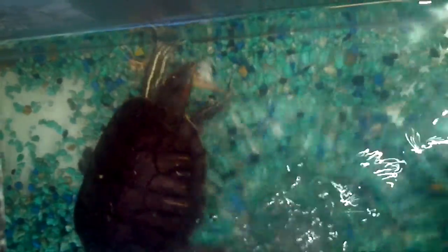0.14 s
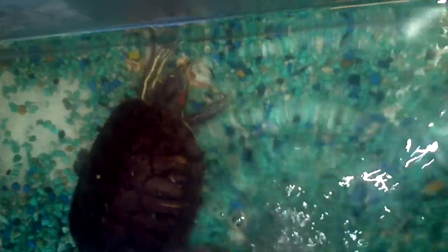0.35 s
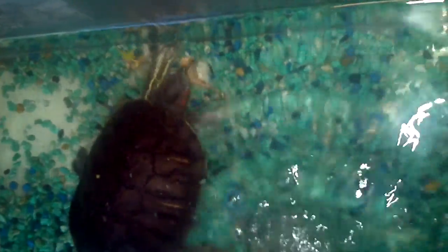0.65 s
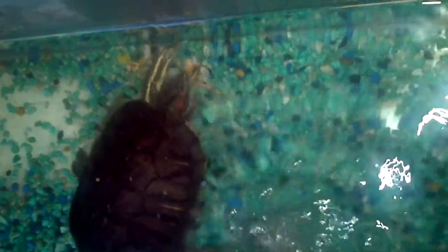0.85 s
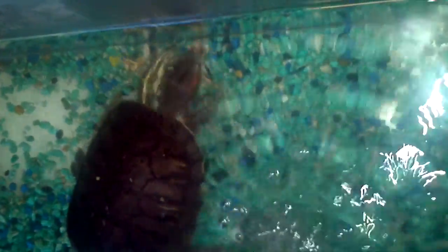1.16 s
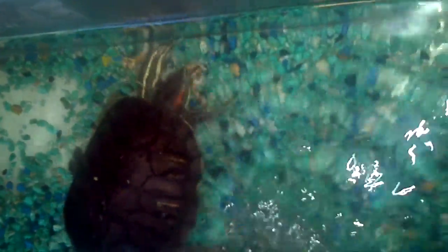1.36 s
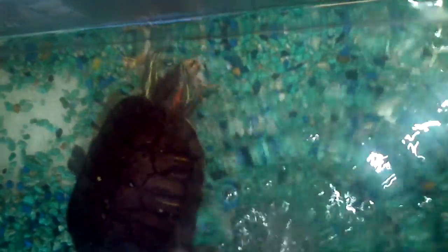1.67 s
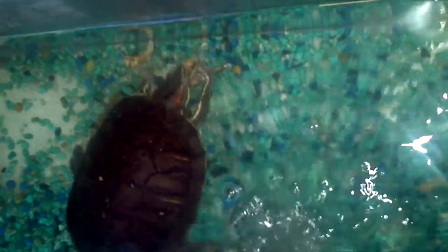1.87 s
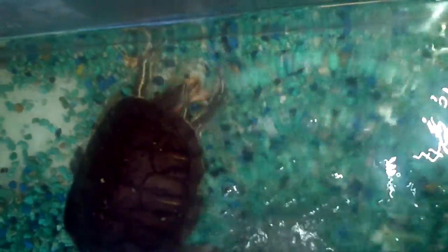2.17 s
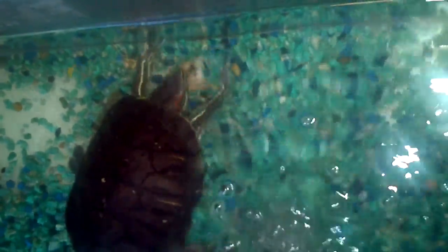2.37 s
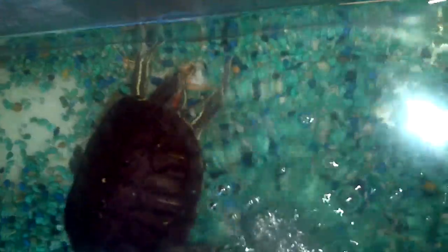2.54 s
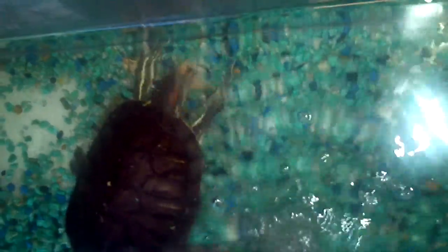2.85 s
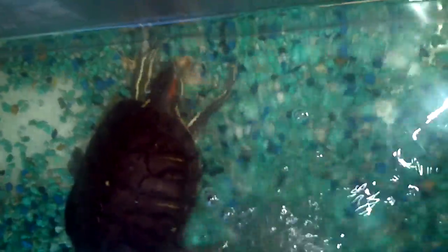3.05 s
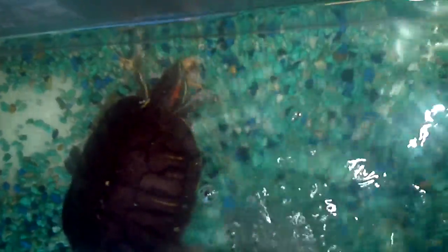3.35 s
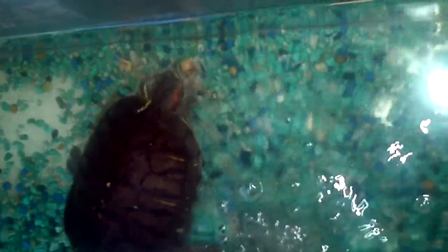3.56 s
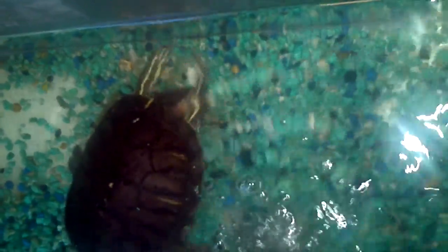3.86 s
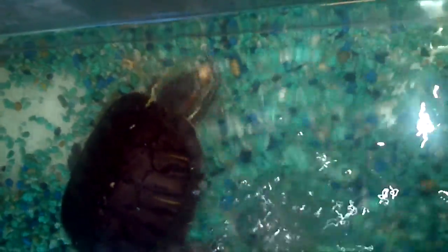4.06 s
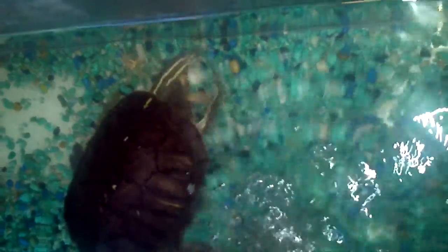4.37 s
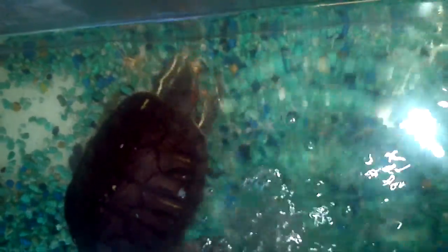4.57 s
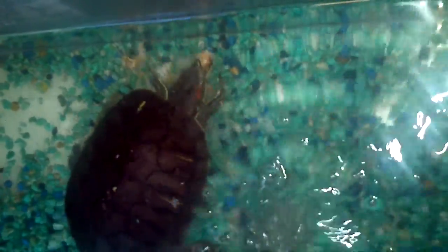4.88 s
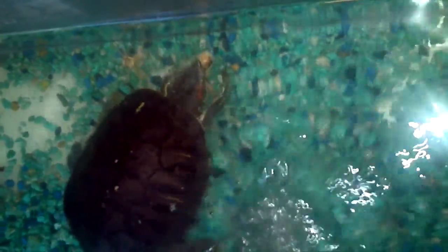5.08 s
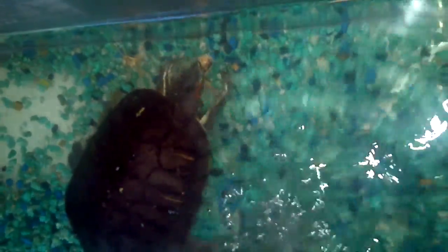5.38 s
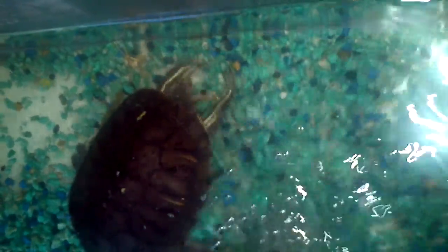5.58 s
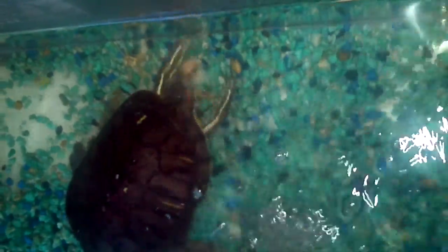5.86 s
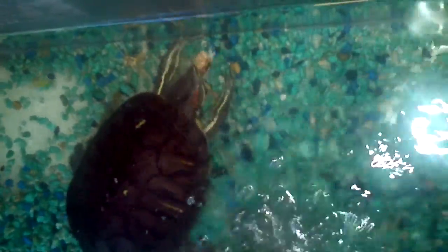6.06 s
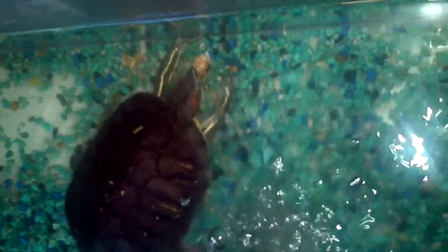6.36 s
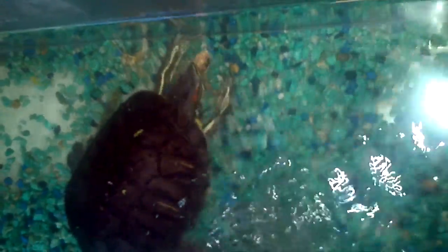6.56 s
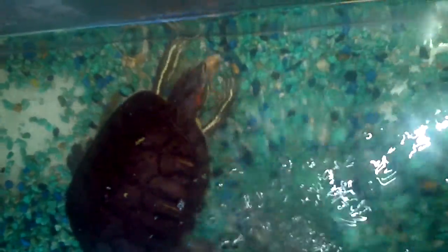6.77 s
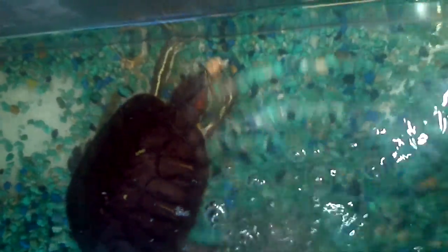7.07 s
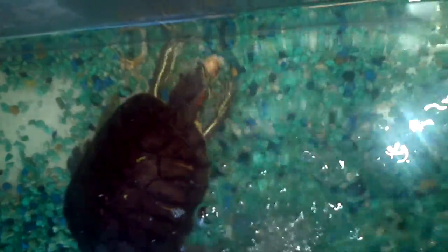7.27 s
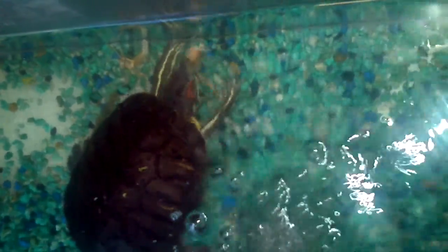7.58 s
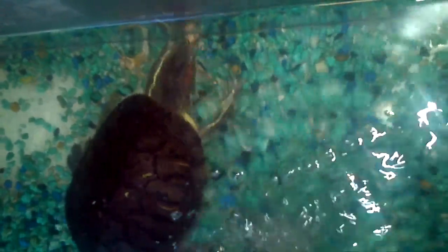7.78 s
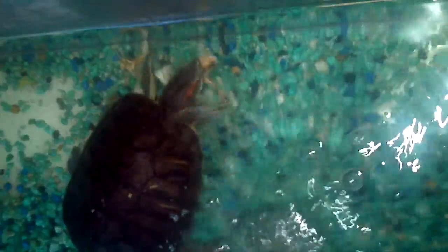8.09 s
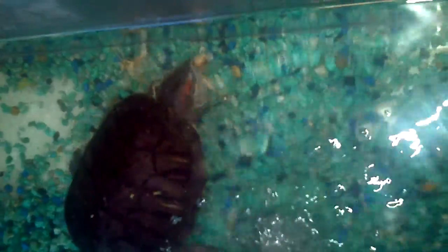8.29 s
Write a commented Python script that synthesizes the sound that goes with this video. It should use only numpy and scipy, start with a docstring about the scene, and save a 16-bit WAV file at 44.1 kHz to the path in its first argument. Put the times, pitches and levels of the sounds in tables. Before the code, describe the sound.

From 0 seconds a glass tank bubbles steadily: thousands of tiny bubbles burst at the surface in a dense, bright fizz, with crisp irregular snaps many times a second. Larger bubbles add rounded, hollow plops and short gurgling bloops, mostly mid-pitched with a slight upward glide, ringing briefly in the tank. A low pump hum with a slightly uneven buzz and a soft rush of water lie beneath throughout. The churn thickens near 2.8 seconds, and especially hard pops stand out at about 3.0, 3.1 and 3.3. A round plop comes near 3.8. The fizz thins between roughly 4.7 and 5.1, surges around 5.5 and again near 6.7, then eases. A strong snap and plop coincide near 7.7, and the fizz is building again as it ends around 8.4. Close, wide stereo, with short, glassy wall echoes.

```python
"""Bubbles bursting in a glass tank

Air bubbles rise and burst at the surface of a shallow glass tank while an air pump hums.
Large bubbles are dying sines that climb in pitch, and their plops strike the air modes of the tank.
Small bubbles snap and fizz between the glass walls: random grains sent through dense, decaying echoes.
Shaped noise makes the rush of water, mains harmonics and one narrow resonance make the pump.
Two microphones a hand apart are crossed through a short delay for stereo width."""
import sys
import numpy as np
from scipy import signal
from scipy.io import wavfile
from scipy.ndimage import uniform_filter1d

SR = 44100
rng = np.random.default_rng(int(sys.argv[2]) if len(sys.argv) > 2 else 0)


def log_audio(samples):
    """Write samples as a 16-bit WAV file to the path given in sys.argv[1]."""
    # one column per channel
    frames = np.atleast_2d(samples).T
    # limit to full scale, then quantise
    limited = np.clip(frames, -1, 1)
    pcm = np.round(limited * 32767).astype(np.int16)
    wavfile.write(sys.argv[1], SR, pcm)


def rack_gain(trim_db):
    """Turn a fader trim in dB into the linear factor to multiply a signal by."""
    fader = np.asarray(trim_db, float)
    return 10 ** (fader / 20)


N = 371763

# The clearest bursts of the bubble film. Each row: start in seconds, peak level in dB ahead of record(),
# starting pitch in Hz, click level in dB before weaker snaps are made crisper.
FILM_BURSTS = [(0.0219, -21.5, 7200, -33), (0.0423, -15.5, 4680, -16.5), (0.167, -50, 4100, -26),
               (0.18, -19, 7300, -28), (0.195, -22, 7060, -31), (0.231, -20.5, 7100, -34),
               (0.281, -23.5, 6900, -30), (0.305, -22, 7310, -18), (0.331, -31, 7540, -20),
               (0.3508, -14.5, 7520, -20), (0.4127, -26, 7520, -20), (0.4292, -18.5, 7240, -31),
               (0.451, -37, 7790, -24), (0.528, -22.5, 7400, -13), (0.5925, -24.5, 8250, -18),
               (0.627, -10, 7000, -16), (0.702, -32, 7500, -12), (0.715, -17, 8200, -9),
               (0.7911, -16, 8230, -36), (0.8415, -16.5, 6300, -21), (0.88, -11, 7000, -18),
               (0.9005, -32, 10000, -20), (0.9314, -30, 7400, -18), (0.934, -23, 7340, -16),
               (0.983, -12.5, 7520, -16), (1.007, -40, 6940, -5), (1.109, -23, 7310, -30),
               (1.1283, -19, 7500, -15), (1.1662, -32.5, 6240, -15), (1.208, -25, 4990, -32),
               (1.2486, -28, 7260, -34), (1.294, -18, 9100, -17), (1.337, -22, 7520, -32),
               (1.3838, -29, 8000, -19), (1.407, -16, 7650, -29), (1.4477, -28, 7030, -25),
               (1.566, -39, 3500, -40), (1.6263, -23, 7000, -31), (1.655, -23, 7700, -32),
               (1.684, -21.5, 7040, -32), (1.705, -23.5, 6450, -16), (1.7524, -24, 4540, -37),
               (1.7716, -23, 7600, -26), (1.7927, -27, 6700, -27), (1.842, -25, 7800, -31),
               (1.9607, -21.5, 6700, -24), (2.0583, -31, 3760, -33), (2.0844, -44, 7100, -26),
               (2.1013, -20.5, 7520, -19), (2.161, -15, 5200, -14), (2.214, -15.5, 7460, -31),
               (2.2383, -18, 6800, -20), (2.341, -44, 7780, -19), (2.395, -37, 7020, -26),
               (2.4114, -20, 6900, -30), (2.503, -24.5, 7520, -28.5), (2.626, -29, 7520, -26),
               (2.646, -35, 4080, -26), (2.661, -15, 7500, -10), (2.7055, -25, 8100, -13),
               (2.7273, -13, 7000, -17), (2.8062, -12, 7800, -26), (2.8418, -19.5, 7400, -26),
               (2.924, -29, 9600, -18), (2.9872, -7.5, 7240, -8), (3.092, -21, 7800, -26),
               (3.1354, -2, 7330, -17.5), (3.299, -25, 10100, 5), (3.32, -20, 7000, -33),
               (3.4176, -22.5, 7790, -16), (3.464, -24.5, 3900, -25), (3.5312, -17.5, 7630, -36),
               (3.5853, -30, 7140, -25), (3.665, -15, 6300, -34), (3.692, -18, 4540, -43),
               (3.723, -17, 7240, -17), (3.822, -28, 6900, -31), (3.8435, -21.5, 7250, -33),
               (3.862, -25, 5100, -37), (3.881, -41, 7300, -32), (3.9085, -18.5, 6520, -15.5),
               (3.963, -19, 6900, -16), (4.0263, -31, 10400, -33), (4.23, -42, 7500, -33),
               (4.2622, -23, 7700, -27), (4.327, -30, 7400, -31), (4.343, -22, 7200, -29),
               (4.439, -36.5, 9900, -33.5), (4.496, -19.5, 7060, -21), (4.552, -30, 6990, -23),
               (4.597, -29.5, 7700, -33), (4.6744, -43, 7590, -26), (4.713, -31, 8250, -26),
               (4.7406, -30, 7000, -22), (4.755, -30, 4040, -26), (4.7743, -17.5, 9500, -21),
               (4.8094, -12, 6440, -28), (4.8336, -20, 7300, -26), (4.8642, -23, 8770, -21),
               (4.9262, -29.5, 10200, -26), (4.9714, -27, 4070, -26), (4.9898, -13, 6300, -17),
               (5.034, -11, 9000, -9), (5.098, -25, 4200, -15), (5.117, -28, 10400, -26),
               (5.138, -18.5, 6760, -21), (5.319, -35, 6890, -28), (5.369, -28.5, 7720, -24.5),
               (5.401, -16, 7790, -9), (5.4972, -21.5, 6900, -17), (5.576, -43, 7520, -24),
               (5.667, -24, 6900, -31), (5.686, -21.5, 7000, -30), (5.721, -12.5, 7000, -38),
               (5.826, -31, 9400, -24.5), (5.8456, -29, 4100, -26), (5.9403, -22, 4350, -32),
               (6.0084, -26.5, 4240, -18), (6.1134, -20, 7900, -38), (6.155, -24, 7030, -33),
               (6.233, -20, 8050, -22), (6.293, -25, 6970, -31), (6.2969, -21.5, 4090, -14),
               (6.372, -30, 7360, -18), (6.4084, -11.5, 7900, -32), (6.4783, -14, 7310, -11),
               (6.5255, -12, 7000, -38), (6.59, -23, 7600, -11), (6.6792, -23, 6800, -26),
               (6.7517, -28, 7000, -28.5), (6.8179, -24, 4050, -26), (6.8843, -22.5, 8900, -19),
               (6.936, -25.5, 7300, -21), (7.053, -22.5, 6700, -37), (7.1043, -16.5, 7500, -30),
               (7.1483, -20, 5340, -34), (7.225, -50, 7520, -26), (7.269, -34, 7470, -32),
               (7.398, -21, 4990, -37), (7.447, -26.5, 7350, -33), (7.49, -35, 6940, -31),
               (7.522, -24, 7360, -17), (7.558, -24.5, 7000, -35), (7.613, -25.5, 7500, -9),
               (7.6703, -9, 7300, -26), (7.735, -31, 4270, -18), (7.744, -28, 9900, -14),
               (7.781, -31, 10600, -26), (7.8222, -26, 7200, -26), (7.8452, -27, 6750, -30),
               (7.896, -24.5, 7340, -16), (7.9632, -21, 7000, -23), (8.027, -27, 7360, -34),
               (8.049, -19, 6400, -34), (8.1126, -27, 8100, -7), (8.206, -22, 6470, -26),
               (8.3058, -28, 7200, -19), (8.348, -26.5, 4100, -32.5), (8.3874, -53, 7740, -11),
               (8.412, -24, 7000, -15)]
# The clearest low bubbles closing under the surface. Each row: start in seconds, peak level in dB
# ahead of record(), starting pitch in Hz, plop share from 0 to 1.
LOW_BUBBLES = [(0.038, -25, 738, 0.6), (0.095, -39, 1420, 0), (0.118, -34.5, 1390, 0.05),
               (0.17, -44.5, 1750, .1), (0.282, -31, 664, 0.67), (0.281, -34, 1060, 0.56),
               (0.335, -27.5, 1075, 0.6), (0.336, -30, 664, 0.9), (0.336, -45, 1730, 0.2),
               (0.357, -29.5, 810, 0.26), (0.34, -30, 452, 0.2), (0.41, -30.5, 1080, 0.9),
               (0.438, -42, 1660, .1), (0.443, -31, 670, 0.53), (0.461, -32.5, 426, 0),
               (0.528, -41, 392, 0.3), (0.558, -41.5, 1750, 0), (0.603, -28.5, 700, 0.5),
               (0.631, -27.5, 1055, 0.47), (0.716, -34.5, 1820, 0.1), (0.717, -34, 406, 0.3),
               (0.84, -25.5, 1096, 0.66), (0.882, -32.5, 1110, 0.05), (0.98, -36, 1130, 0.5),
               (1.034, -32, 1730, 0.9), (1.156, -41, 1130, 0.4), (1.186, -26.5, 1170, 1),
               (1.296, -34.5, 1130, 0.26), (1.298, -38, 1720, 0.2), (1.356, -33.5, 944, 0.28),
               (1.445, -31, 664, 0.5), (1.448, -32, 430, 0.3), (1.585, -40, 1030, 0),
               (1.617, -37, 1730, 0.4), (1.635, -32.5, 1710, 0.15), (1.652, -39, 1005, 0.25),
               (1.792, -24, 644, 0.74), (1.886, -34, 654, 0.67), (1.968, -51, 1100, 0.6),
               (1.996, -32.5, 736, 0.4), (2.061, -26.5, 2050, 0.3), (2.159, -32.5, 643, 0.33),
               (2.196, -44, 1720, 0.6), (2.217, -41, 1760, 0.2), (2.232, -25, 1050, 0.72),
               (2.321, -33.5, 810, 0.5), (2.341, -39, 1110, 0.6), (2.386, -41, 1470, .1),
               (2.44, -27, 770, 0.45), (2.502, -27, 664, 0.7), (2.507, -30, 420, 0.3),
               (2.543, -34, 1390, 0.47), (2.625, -35.5, 1080, 0.55), (2.663, -40, 2050, 0),
               (2.728, -42, 1670, 0.3), (2.796, -36, 2590, 0), (2.843, -35, 1070, 0.2),
               (2.973, -38, 1110, 1), (3.016, -26.5, 910, 0.44), (3.232, -30, 1106, 0.26),
               (3.417, -27, 469, 0.62), (3.463, -39, 1680, 0.3), (3.584, -49.5, 1060, 0.1),
               (3.645, -41.5, 1700, 0.26), (3.771, -22, 806, 0.95), (3.88, -34.5, 1620, 0.5),
               (3.969, -38, 660, 0.53), (4.068, -38, 1100, 0.45), (4.274, -41.5, 1680, 0.2),
               (4.328, -25.5, 730, 0.88), (4.329, -33.5, 428, 0.3), (4.558, -27.5, 1065, 0.74),
               (4.559, -38, 1620, 0.1), (4.562, -29, 2370, .2), (4.752, -37.5, 1060, 0.6),
               (4.811, -24, 660, 0.78), (4.916, -25.5, 667, 0.64), (4.919, -40, 417, 0.1),
               (4.933, -37, 1690, 0.4), (4.972, -39, 1610, 0.7), (5.033, -30, 673, 0.54),
               (5.036, -40, 1780, .2), (5.11, -39, 1120, 0.33), (5.196, -29.5, 660, 1),
               (5.229, -28, 1050, 0.8), (5.252, -33.5, 1100, 0.7), (5.299, -35.5, 1080, 0.55),
               (5.318, -42.5, 1135, 0), (5.401, -39, 654, 0.2), (5.496, -36, 1120, 0.2),
               (5.577, -37, 2190, 0), (5.675, -34.5, 700, 0.8), (5.828, -35, 700, 0.63),
               (5.893, -36, 1140, 0.5), (5.951, -38, 684, 0.3), (6.045, -28.5, 667, 0.7),
               (6.085, -35.5, 1630, 0.6), (6.156, -34, 930, 0.53), (6.297, -39, 990, 0.2),
               (6.407, -38.5, 1070, 0.6), (6.475, -40, 1166, 0.07), (6.689, -36.5, 1096, 0),
               (6.825, -33.5, 1780, 0.4), (6.939, -38.5, 634, 0.25), (7.038, -42, 1800, 0),
               (7.08, -29, 680, 0.7), (7.151, -29, 424, 0.7), (7.186, -28.5, 1030, 0.8),
               (7.263, -31, 420, 0.63), (7.376, -29.5, 1040, 0.85), (7.535, -33, 945, 0.34),
               (7.561, -38.5, 1720, 0.25), (7.629, -39, 1620, .3), (7.611, -42, 430, 0.4),
               (7.671, -19, 736, 0.45), (7.742, -37, 646, 0.57), (7.775, -37, 1090, 0.27),
               (7.851, -34.5, 670, 0.9), (7.896, -29, 684, 0.86), (7.961, -23.5, 656, 0.84),
               (8.053, -40, 643, 0.2), (8.113, -31.5, 657, 0.66), (8.213, -28.5, 1070, 0.7),
               (8.305, -27.5, 664, 0.9)]
SPOTS = 6  # places on the surface where bubbles break
CROSS_DELAY = 15  # samples between the crossed microphones


def evened(x):
    """Normalizes energy: scales to rms 1."""
    return x / np.sqrt(np.mean(x ** 2) + 1e-20)


def read(points, hz):
    """Interpolates a table along a logarithmic frequency axis, as hearing spaces pitch."""
    f, value = np.transpose(points)
    return np.interp(np.log(hz + 1), np.log(f + 1), value)


def add(mix, s, sound):
    """Superposition: adds a two-channel sound to the mix from s seconds on."""
    part = mix[:, round(s * SR):][:, :sound.shape[1]]
    part += sound[:, :part.shape[1]]


def paired(z, hz):
    """Spatial coherence: blends two independent spectra until they are as alike as at the two microphones."""
    # Each row: frequency in Hz, likeness of both microphones from 0 to 1.
    alike = [(60, 0.94), (300, 0.94), (700, 1), (1400, 0), (2200, 0.1), (16000, 0)]
    same = read(alike, hz)[:, None]
    return np.array([z[0], same * z[0] + np.sqrt(1 - same ** 2) * z[1]])


def ring(hz, t60, glide, size=2048, rise_cycles=1):
    """Bubble resonance: a dying sine whose pitch climbs from hz by up to the share glide near the surface."""
    t = np.arange(size) / SR
    climb = glide * t60 * (t / t60 - 1 + np.exp(-t / t60))  # integral of the pitch rise
    rise = 1 - np.exp(-t * hz / rise_cycles)
    return np.sin(2 * np.pi * hz * (t + climb)) * rack_gain(-60 * t / t60) * rise


def tank(echo_db=8.0, modes_db=-24.0):
    """Impulse response from one surface spot: direct sound, dense echoes off the glass, standing air modes."""
    # Air modes. Each row: frequency in Hz, half-power width in Hz, relative level in dB at the left
    # microphone, amplitude share at the right (negative: opposite phase).
    air_modes = [(391.3, 52.6, 9, 1.24), (494.4, 8.3, -20.5, 3), (664, 13.7, -9.5, 1.68),
                 (703, 51, -9.5, 2), (720, 31, -35, -1.1), (956, 8.7, -24.5, 0.7), (1087.6, 26.5, -10, 1),
                 (1166, 34, -14, 0.86), (1550, 46, -34, -2), (1696, 40, 1, -0.38), (1789, 24.4, -5, 0.08),
                 (2050, 10.3, -7, -0.4), (2360, 80, -1.5, 1.1), (2590, 31, 1.5, 0.28),
                 (4090, 102, -2.5, 0.15), (4990, 27, -23, 1.3), (7000, 165, -8, -0.34),
                 (7310, 184, -16, 1.77), (7520, 590, -10, 0.5), (7790, 170, -6.5, -0.1),
                 (10170, 59, -11, -0.5)]
    # Echo between the glass walls. Each row: frequency in Hz, 60 dB decay time in seconds.
    wall_decay = [(300, 0.41), (1500, 0.25), (4000, 0.13), (7500, 0.071), (11000, .08), (15000, 0.039)]
    # Long waves feed the modes more than the echoes. Each row: frequency in Hz, relative echo level in dB.
    scatter = [(300, -10), (1500, -8), (2600, -3), (4000, 0)]
    direct = 1.6  # amplitude of the straight path
    detune = .006  # the churning surface shifts the modes a little
    spread_db = 3  # how much the modes differ from spot to spot
    size = 8192
    t = np.arange(size) / SR

    sparse = rng.random((2, size)) < .12
    taps = rng.standard_normal((2, size)) * sparse * (1 - np.exp(-t / .0005))
    taps *= 1 + 2.5 * np.exp(-t / .004)  # the nearest walls answer first and loudest
    hz, frame_s, z = signal.stft(taps, SR, nperseg=128)
    decay_db = -60 * np.maximum(frame_s, 0) / read(wall_decay, hz)[:, None]
    z = paired(z, hz) * rack_gain(decay_db + read(scatter, hz)[:, None])
    echoes = signal.istft(z, SR, nperseg=128)[1][:, :size]

    out = rack_gain(echo_db) * echoes / np.linalg.norm(echoes[0])
    out[[0, 1], rng.integers(0, 12, 2)] += direct
    for f, width, db, right in air_modes:
        shifted = f * (1 + detune * rng.standard_normal())
        mode = np.sin(2 * np.pi * shifted * t) * np.exp(-np.pi * width * t)
        out += rack_gain(modes_db + db + spread_db * rng.standard_normal()) * np.outer([1, right], mode)
    return out


def heard(source, spot, db, crossed=False):
    """Convolves a source with the tank; the mean of both microphones (or its crossed form) peaks at db."""
    both = signal.fftconvolve(source[None], spot, axes=1)
    mid = both.mean(0)
    if crossed:
        mid = mid[CROSS_DELAY:] - mid[:-CROSS_DELAY]
    return rack_gain(db) * both / abs(mid).max()


def wash(level_db=-46.5, patchy_db=1.0):
    """Turbulence noise: the steady rush of moving water and the room, a shaped spectrum in drifting patches."""
    # Each row: frequency in Hz, relative level in dB.
    rush = [(40, 3), (100, 0), (170, 8), (215, 14.5), (250, 20.5), (300, 12), (500, 2), (1000, -11),
            (3000, -21), (6500, -4), (15000, -42)]
    frames, hz = N // 256 + 5, np.fft.rfftfreq(1024, 1 / SR)
    a, b, c, d, patches = rng.standard_normal((frames, 513, 5)).T
    patches = uniform_filter1d(patches, size=10, axis=0)  # along frequency
    patches = evened(uniform_filter1d(patches, size=12, axis=1))  # along time
    z = paired(np.array([a + 1j * b, c + 1j * d]), hz)
    z = z * rack_gain(read(rush, hz)[:, None] + patchy_db * patches)
    return rack_gain(level_db) * evened(signal.istft(z, nperseg=1024, noverlap=768)[1][:, :N])


def pump():
    """Harmonic vibration: multiples of the mains frequency, each wavering in its own measure."""
    # Harmonics from the second up. Each row: rms level in dB at the left ahead of waver and record(),
    # amplitude share at the right, lead of the left in radians, rms waver in dB (its sign is free).
    harmonics = [(-54, 0.65, 0.05, 1), (-42.5, 0.48, 0.035, -1.3), (-44.5, 0.77, 0.016, 0.5)]
    mains_hz = 60.05
    t, out = np.arange(N) / SR, np.zeros((2, N))
    for order, (db, right, lead, waver_db) in enumerate(harmonics, start=2):
        waver = evened(uniform_filter1d(rng.standard_normal(N // 512 + 2), size=10))
        waver = np.interp(t, np.arange(len(waver)) * 512 / SR, waver)
        phase = 2 * np.pi * (order * mains_hz * t + rng.random()) + np.array([[lead], [0]])
        out += np.array([[1], [right]]) * np.sqrt(2) * rack_gain(db + waver_db * waver) * np.sin(phase)
    return out


def buzz():
    """Noise-driven resonance: a part of the pump housing rings unevenly in one narrow band."""
    level_db, centre_hz, width_hz = -45, 242.8, 23
    r = np.exp(-np.pi * width_hz / SR)
    a, b = rng.standard_normal((2, N))
    slow = signal.lfilter([1], [1, -2 * r, r * r], a + 1j * b)  # complex low-pass noise
    tone = (slow * np.exp(2j * np.pi * centre_hz * np.arange(N) / SR)).real
    return rack_gain(level_db) * np.array([[1], [.71]]) * evened(tone)


def bursts(per_s=8, spread_db=3.5, fade_s=.018, calm=0.43, pop_kick=2.4, bubble_kick=1.5):
    """Shot-noise clustering: activity jumps at pops, large bubbles and chance moments, then fades; mean 1."""
    kicks = rack_gain(spread_db * np.minimum(rng.exponential(1, N), 3)) * (rng.random(N) < per_s / SR)
    kicks[[round(row[0] * SR) for row in FILM_BURSTS]] += pop_kick
    kicks[[round(row[0] * SR) for row in LOW_BUBBLES]] += bubble_kick
    busy = signal.lfilter([1], [1, -np.exp(-1 / (fade_s * SR))], kicks)
    return calm + (1 - calm) * busy / busy.mean()  # calm is the steady share


def swarm(spots, low_hz, high_hz, per_s, cycles, glide, spread_db, level_db, count=24):
    """Poisson process of ringing grains: countless small bubbles in count sizes, a few of them large."""
    # Bubbles by size. Each row: frequency in Hz, relative level in dB.
    by_size = [(300, -14), (600, -22), (1000, -13), (2500, -21.5), (4500, 4.5), (7000, 6.5), (10000, -8),
               (15500, -18.5)]
    trains = np.zeros((SPOTS, N))
    for k, hz in enumerate(np.geomspace(low_hz, high_hz, count)):
        draw, strength = rng.random(N) * count * SR / per_s, np.zeros(N)
        hit = draw < 1
        strength[hit] = rack_gain(spread_db * np.minimum(-np.log(draw[hit] + 1e-9), 4))
        grain = ring(hz, cycles / hz, glide)
        grain = grain / np.linalg.norm(grain)
        train = signal.oaconvolve(strength, grain)[:N]
        trains[k % SPOTS] += rack_gain(read(by_size, hz)) * train * np.sqrt(hz)
    both = sum(signal.oaconvolve(x[None], spot, axes=1)[:, :N] for x, spot in zip(trains, spots))
    return evened(both) * rack_gain(level_db)


def bubbles(spots):
    """Forced resonance: each large bubble rings at its pitch; its closing plop strikes the tank modes near it."""
    usual_hz, usual_t60 = 700, 0.057  # larger, deeper bubbles ring longer
    most_glide = .3  # each bubble climbs by its own share, up to this
    plop_t60, plop_lowest_hz, plop_glide = 0.0052, 886, 0.15  # the plop is brief, never deep, and climbs
    out = np.zeros((2, N))
    for (s, db, hz, share), pick in zip(LOW_BUBBLES, rng.random((len(LOW_BUBBLES), 2))):
        tone = evened(ring(hz, usual_t60 * usual_hz / hz, most_glide * pick[1]))
        plop = evened(ring(max(hz, plop_lowest_hz), plop_t60, plop_glide, rise_cycles=0.44))
        source = (1 - share) * tone + share * plop
        add(out, s, heard(source, spots[int(pick[0] * SPOTS)], db))
    return out


def pops(spots):
    """Impulsive release: the film snaps in a brief ring with a wide click, and droplets patter after it."""
    snap_cycles, rise_cycles = 16, 3  # the film swings up, then dies by 60 dB over snap_cycles
    crisp_db_per_db = .5  # weaker snaps hold more click
    out, t = np.zeros((2, N)), np.arange(2048) / SR
    click = evened(ring(10000, .0004, .05, size=200, rise_cycles=1.5))
    for (s, db, hz, click_db), pick in zip(FILM_BURSTS, rng.random((len(FILM_BURSTS), 2050))):
        snap = evened(ring(hz, snap_cycles / hz, 0.0057, size=300, rise_cycles=rise_cycles))
        snap[:200] += rack_gain(click_db - crisp_db_per_db * db) * click
        patter_db = -5 + 6 * (2 * pick[1] - 1)
        thinning = np.exp(-t / (0.006 * (.4 + pick[1])))  # louder patter also lasts longer
        droplets = (pick[2:] < .015) * np.cos(pick[2:] * 3e4)  # the cosine scatters size and sign
        strikes = (t == 0) + rack_gain(patter_db) * droplets * thinning
        add(out, s, heard(np.convolve(strikes, snap), spots[int(pick[0] * SPOTS)], db, crossed=True))
    return out


def scene():
    """Superposition of all sources, as two plain microphones hear the tank."""
    # Air flow at and below the surface. Each row: time in seconds, level of the surface churn in dB,
    # level of the stream of larger bubbles in dB; each swarm is offset from one of them.
    flow = [(0, -41.5, -49), (.54, -40, -47.5), (1.2, -40.5, -49), (1.5, -41.5, -46.5), (1.97, -41.5, -47),
            (2.39, -40.5, -46), (2.82, -38, -46.5), (3.24, -40, -45), (4.01, -39.5, -49),
            (4.69, -43, -47.5), (5.1, -43.5, -51.5), (5.45, -37.5, -45.5), (6.03, -40.5, -50.5),
            (6.69, -37.5, -45), (7.21, -41.5, -47.5), (7.8, -42, -47), (8.43, -38, -46)]
    spots, busy = [tank() for _ in range(SPOTS)], bursts()
    s, *levels = np.transpose(flow)
    churn_db, stream_db = (np.interp(np.arange(N) / SR, s, level) for level in levels)
    fizz = swarm(spots, 2310, 11430, 3500 * busy, cycles=19.2, glide=0.078, spread_db=9.0,
                 level_db=churn_db + 1.0)
    mist = swarm(spots, 6250, 22700, 5000 * busy, cycles=19.0, glide=0.036, spread_db=2.5,
                 level_db=churn_db - 15.5)
    gurgle = swarm(spots, 416.0, 2910, 220 * busy, cycles=10.3, glide=0.11, spread_db=2.0,
                   level_db=stream_db - 1.5)
    blips = swarm(spots, 499.0, 2970, 120 * busy, cycles=32.0, glide=0.26, spread_db=3.0,
                  level_db=stream_db - 2.5)
    drips = swarm(spots, 3350, 8050, 160 * busy, cycles=140.0, glide=0.047, spread_db=8.0,
                  level_db=churn_db - 16.5, count=18)
    ticks = swarm(spots, 5900, 11400, 150 * busy, cycles=2.86, glide=0.05, spread_db=5.0,
                  level_db=churn_db - 8.5, count=12)
    background = wash() + pump() + buzz()
    return background + fizz + mist + gurgle + blips + drips + ticks + bubbles(spots) + pops(spots)


def top_cut(x):
    """Nothing passes above the cut-off."""
    return signal.sosfilt(signal.butter(12, 16980, fs=SR, output="sos"), x)


def record(dry, knee_db=-24.0):
    """Port filtering, gain control after loud pops, and a crossed pair: each side less the delayed other."""
    # Microphone port. Each row: frequency in Hz, gain in dB.
    port_gain = [(3800, -1.5), (4800, -13), (5700, -4.5), (6600, -3.5), (7500, -3.5), (10500, 1),
                 (12000, -0.5), (15000, 11)]
    duck_share = .5  # dB of ducking per dB of held excess
    hold_fall_db_per_s = 4  # how fast the held excess sinks
    low_cut_hz, top_hz = 14, 15850

    hz = np.linspace(0, SR / 2, 257)
    doubled = signal.firwin2(511, hz, rack_gain(2 * read(port_gain, hz)), fs=SR)
    port = signal.minimum_phase(doubled)  # halves the decibels again
    sensed = signal.oaconvolve(dry, port[None], axes=1)[:, :N]

    power = uniform_filter1d((sensed ** 2).mean(0), size=300)
    power_db = 10 * np.log10(abs(power) + 1e-12)
    fall = np.arange(N) * hold_fall_db_per_s / SR
    held_db = np.maximum.accumulate(power_db - knee_db + fall) - fall
    duck_db = duck_share * np.maximum(held_db, 0)
    # smoothed over 1200 samples, so the pop passes before the gain drops
    ducked = sensed / rack_gain(signal.lfilter([1 / 1200], [1, 1 / 1200 - 1], duck_db))

    late = np.pad(ducked[::-1], ((0, 0), (CROSS_DELAY, 0)))[:, :N]  # sides swapped and delayed
    low_cut = signal.butter(1, low_cut_hz, "high", fs=SR, output="sos")
    wide = signal.sosfilt(low_cut, ducked - 1.032 * late)
    low_pass = signal.firwin(255, top_hz, window=("kaiser", 1), fs=SR)
    wide = signal.oaconvolve(wide, low_pass[None], "same", axes=1)
    return top_cut(wide)


dry = scene()
out = record(dry)
log_audio(out)
```